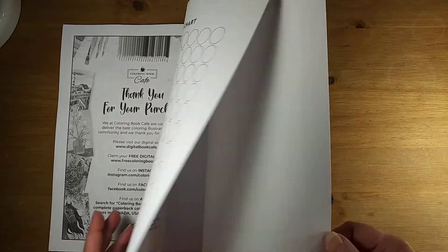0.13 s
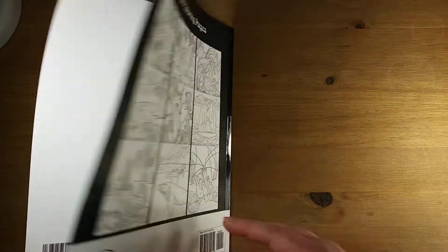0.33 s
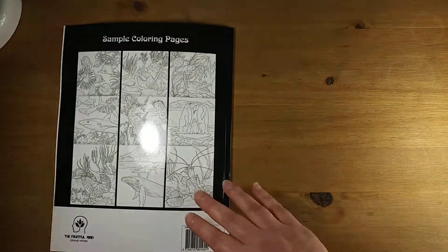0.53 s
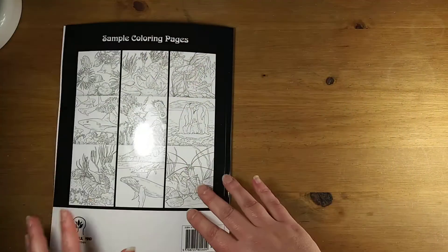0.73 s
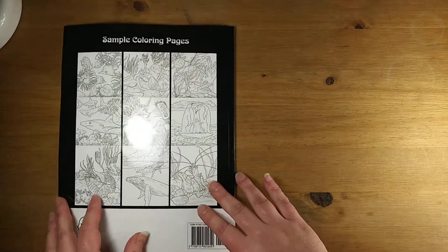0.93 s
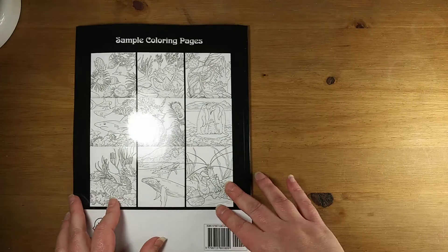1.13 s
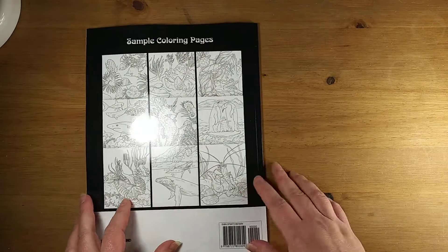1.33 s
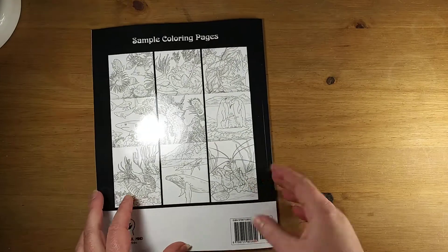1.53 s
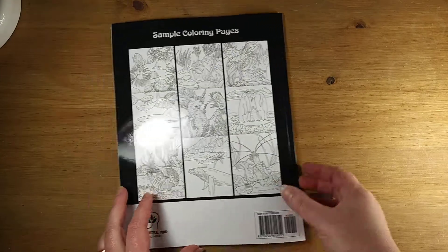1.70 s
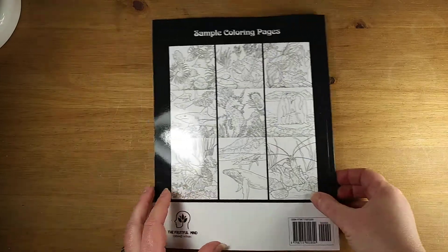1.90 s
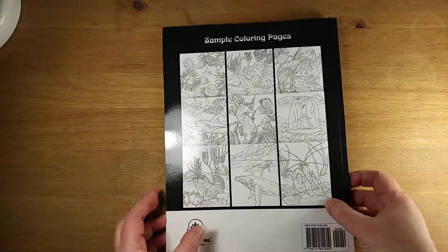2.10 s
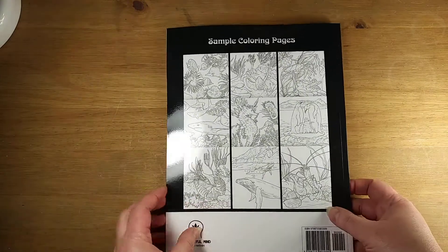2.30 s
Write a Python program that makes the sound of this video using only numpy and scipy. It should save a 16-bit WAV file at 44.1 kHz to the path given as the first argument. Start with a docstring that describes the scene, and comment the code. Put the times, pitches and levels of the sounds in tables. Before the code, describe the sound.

A paperback is flipped shut on a wooden table, heard close in a small room. Pages brush and flap, then land around 0.3 seconds in a quick run of soft thuds with a puff of air, settling by 0.5. Light ticks follow, and a fingertip tap at 1.3. The book slides quietly over the wood in short scrapes until about 2.2, and the cover clicks at 2.3.

```python
"""Paperback shut on a wooden table

A glossy paperback is flipped shut in a small room, heard from close above. Pages brush and flap,
the stack lands in a quick run of soft blows under a faint high hiss, and the cover settles on its
cushion of air. Fingers then tap, tick against the cover and slide the book across the wood."""
import sys
import numpy as np
from scipy import signal
from scipy.fft import rfft, irfft
from scipy.io import wavfile

SR = 44100
rng = np.random.default_rng(int(sys.argv[2]) if len(sys.argv) > 2 else 0)


def generate_wav(sig):
    """Save sig (samples, or channels by samples) to the path in sys.argv[1] as 16-bit PCM at SR."""
    pcm = np.round(np.clip(np.atleast_2d(sig).T, -1, 1) * 32767).astype(np.int16)
    wavfile.write(sys.argv[1], SR, pcm)


N = 103635


def amp(db):
    """Decibels to gain."""
    return 10 ** (np.asarray(db) / 20)


def unit(x):
    """Scales to an energy of one."""
    return x / np.sqrt(np.sum(x ** 2) + 1e-20)


def steady(x):
    """Scales to an rms of one."""
    return unit(x) * np.sqrt(len(x))


def curve_at(points, hz):
    """Reads a curve on a logarithmic frequency axis."""
    f, value = np.transpose(points)
    return np.interp(np.log(hz + 1), np.log(f + 1), value)


def add(mix, s, sound):
    """Mixes a sound in at s seconds."""
    at = round(s * SR)
    sound = sound[max(-at, 0):]
    part = mix[max(at, 0):][:len(sound)]
    part += sound[:len(part)]


def equalise(x, curve, tilt_db=0, cutoff_hz=None, order=3.04, size=4096):
    """Minimum-phase EQ from a curve, with a tilt per octave and an optional high cut."""
    hz = np.fft.rfftfreq(size, 1 / SR)
    gain = amp(curve_at(curve, hz) + tilt_db * np.log2(hz + 20))
    if cutoff_hz:
        gain = gain / np.sqrt(1 + (hz / cutoff_hz) ** (2 * order))
    cepstrum = irfft(np.log(gain / gain.max() + 1e-6))
    cepstrum[1:size // 2] *= 2  # folded forward, so nothing rings ahead of a hit
    cepstrum[size // 2 + 1:] = 0
    return signal.fftconvolve(x, irfft(np.exp(rfft(cepstrum))))[:len(x)]


def resonate(x, hz, width_hz):
    """One resonance, applied twice for steep flanks."""
    b, a = signal.iirpeak(hz, hz / width_hz, fs=SR)
    return signal.lfilter(b, a, signal.lfilter(b, a, x))


def grains(count, spread_db=3, per_s=7000):
    """A dense crackle of tiny impulses, of random size and sign."""
    sizes = amp(spread_db * np.minimum(rng.exponential(1, count), 4))
    return sizes * rng.choice([-1, 1], count) * (rng.random(count) < per_s / SR)


def swell(rise_s, decay_s, roundness, peak_s=.1):
    """Gives the peak time and sound of a grain cloud that rises and dies."""
    t = np.arange(SR // 2) / SR - peak_s
    envelope = np.exp(-np.maximum(-t / rise_s, t / decay_s) ** roundness)
    return peak_s, grains(len(t)) * envelope


def stroke(start, end, attack_s, release_s):
    """An envelope that rises up to start, holds until end, then releases."""
    t = np.arange(N) / SR
    return np.exp(-np.maximum(np.maximum((start - t) / attack_s, (t - end) / release_s), 0))


# Room tone EQ: f/Hz, level/dB
ROOM_TONE_EQ = [(25, -25.5), (85, -28), (160, -14.5), (220, -5), (400, -2.5), (700, -5.5), (1100, -8.5),
                (3300, -12.5), (4600, -17), (5600, -21), (8300, -25), (10200, -16), (13000, -21.5),
                (15800, -19.5)]
def room_tone():
    """A faint, steady bed of room noise."""
    return amp(-65.5) * steady(equalise(rng.standard_normal(N), ROOM_TONE_EQ))


# Reverb time by band: f/Hz, T60/s
ROOM_T60 = [(150, 0.54), (400, 0.26), (1000, 0.34), (3000, 0.39), (8000, 0.24)]
def room(x, scatter_db=-3.5, scatter_decay_s=.0075, early_s=.034, tail_db=-17):
    """Quick, nearly colourless scatter from the table and things near by, then a short room tail."""
    t = np.arange(SR // 2) / SR
    near, far = rng.standard_normal((2, len(t))) * (t > .0006)
    scatter = 1 + amp(scatter_db) * rfft(unit(near * np.exp(-t / scatter_decay_s)), 2 * len(t))
    flattened = irfft(scatter / abs(scatter) ** .95)[:len(t)]
    early = flattened * np.exp(-(t / early_s) ** 2)
    hz, age, bands = signal.stft(far, SR, nperseg=256)
    decay = np.exp(-np.log(1000) * age / curve_at(ROOM_T60, hz)[:, None])
    tail = signal.istft(bands * decay, SR, nperseg=256)[1][:len(t)]
    return signal.fftconvolve(x, unit(early) + amp(tail_db) * unit(tail))[:N]


# Rustle and hiss cues: start/s, end/s, attack/s, release/s, level/dB, tilt/(dB per octave)
RUSTLE_AND_HISS = [(0, 0.026, .002, 0.02, -58.5, 0.5), (.067, 0.072, 0.0076, 0.016, -60.5, .5),
                   (0.097, 0.15, 0.0056, 0.015, -58, 0.2), (.29, .36, .02, 0.079, -65.5, 10.5),
                   (0.408, 0.459, 0.021, 0.019, -64, -2)]
# Their shared EQ: f/Hz, level/dB
RUSTLE_AND_HISS_EQ = [(60, -40), (200, -22), (450, 1.5), (700, -3.5), (1000, 5), (1500, -8.5), (2000, 1),
                      (3200, -2.5), (4200, 1.5), (5600, -4), (6600, -4), (8000, -12.5), (16000, -17)]
def rustle_and_hiss():
    """The cue at 0.29 s is a faint high treble hiss over the landing; the rest are pages brushing."""
    texture = grains(N, spread_db=4.5)
    return sum(stroke(*shape) * amp(db) * steady(equalise(texture, RUSTLE_AND_HISS_EQ, tilt_db))
               for *shape, db, tilt_db in RUSTLE_AND_HISS)


# Friction whistle cues: start/s, end/s, level/dB, f/Hz
WHISTLES = [(1.37, 1.517, -66.5, 850), (1.67, 1.703, -63, 4400)]
def edge_whistles(q=17, fade_s=.0083):
    """The cover's edge catches on the wood and sings thinly for a moment."""
    drag = grains(N)
    return sum(stroke(start, end, fade_s, fade_s) * amp(db) * steady(resonate(drag, hz, hz / q))
               for start, end, db, hz in WHISTLES)


# Slides of book and hands: start/s, end/s, attack/s, release/s,
# drone level/dB, drone f/Hz, hiss level/dB, hiss tilt/(dB per octave)
SLIDES = [(0.908, 1.322, 0.017, 0.049, -75.5, 870, -68.5, 3.5),
          (1.107, 1.185, 0.027, 0.012, -82, 850, -68, 7),
          (1.362, 1.391, 0.0029, 0.033, -52, 857, -54.5, -3),
          (1.397, 1.406, 0.017, 0.013, -63.5, 1170, -50.5, 5.5),
          (1.417, 1.525, 0.0079, 0.13, -67.5, 810, -65.5, 1.5),
          (1.628, 1.866, 0.055, 0.024, -73, 1040, -58.5, 2.6),
          (1.663, 1.714, 0.02, 0.008, -57.5, 1030, -53.5, 2.5),
          (1.734, 1.765, 0.0091, 0.036, -52.5, 1060, -52, 3.5),
          (1.848, 1.903, 0.0058, 0.028, -54.5, 990, -56, 2),
          (1.927, 2.039, 0.015, 0.039, -64, 985, -61.5, 0),
          (2.096, 2.149, 0.024, 0.1, -66.5, 810, -65, -0.5)]
# EQs of the woody drone and the paper hiss: f/Hz, level/dB
DRONE_EQ = [(60, -31), (150, -14.5), (290, 0), (680, 3), (1150, 6.5), (1400, -14), (16000, -56)]
HISS_EQ = [(100, -66), (900, -8.5), (1450, 3.5), (2300, 1.5), (3000, 1), (4500, -4), (5400, -9),
           (6800, -11), (8200, -20), (10000, -18), (16000, -30.5)]
def cover_slides():
    """The cover drags over the wood: paper hiss over a drone of book and table."""
    out = np.zeros(N)
    for *shape, drone_db, hz, hiss_db, tilt_db in SLIDES:
        drag, fibres = grains(N), grains(N)
        pitched = amp(.5) * unit(resonate(fibres, hz, width_hz=350))
        drone = steady(unit(equalise(drag, DRONE_EQ)) + pitched)
        hiss = steady(equalise(fibres, HISS_EQ, tilt_db))
        out += stroke(*shape) * (amp(drone_db) * drone + amp(hiss_db) * hiss)
    return out


# Modes of the book on the table: f/Hz, level/dB, T60/s
TABLE_MODES = [(222, -10, .22), (263, -2, .19), (362, 0, .12), (421, -5, .2), (455, -6, .2), (556, -6, .17),
               (620, -4, .15), (686, -8, .13), (818, -7, .17), (939, 1, .09), (1416, -11, .1),
               (1568, -4, .09)]
def with_table_ring(push, ring_db):
    """A push on the book together with the ringing it starts in the table."""
    t = np.arange(len(push)) / SR
    modes = sum(amp(db) * np.exp(-np.log(1000) * t / t60) * np.cos(2 * np.pi * hz * t)
                for hz, db, t60 in TABLE_MODES)
    ring = signal.fftconvolve(push, modes)[:len(t)]
    return unit(unit(push) + amp(ring_db) * unit(ring))


def knocks(cues, eq, ring_db):
    """Soft blows: the longer the contact, the duller the knock."""
    out, t = np.zeros(N), np.arange(SR // 2) / SR
    for s, db, contact_s in cues:
        push = equalise(np.exp(-t / contact_s), eq)
        add(out, s, amp(db) * with_table_ring(push, ring_db))
    return out


# Fingertip hits: t/s, level/dB, contact/s
TAPS = [(1.283, -32.5, 0.00034), (1.3152, -24.5, 0.0005), (1.5427, -31, 0.00025), (1.6635, -30.5, 0.0048),
        (1.8835, -33.5, 0.000065), (2.087, -32.5, 0.0022)]
# Fingertip EQ: f/Hz, level/dB
TAP_EQ = [(60, -51), (125, -9), (200, -0.5), (400, -1), (900, 4.5), (2000, -0.5), (16000, -45)]
def finger_taps():
    """Fingertips bump the book and the wood answers."""
    return knocks(TAPS, TAP_EQ, ring_db=0)


# Nail, page and cover ticks: t/s, level/dB, tilt/(dB per octave), chatter decay/s, chatter level/dB
TICKS = [(0.1677, -25, 1, 0.0017, -14), (0.7688, -37, 2, 0.00044, -2), (0.9444, -23, 2.5, .0008, 4),
         (1.315, -31, -1.5, 0.0024, 7), (1.6605, -25.5, 0.2, 0.0037, -13), (1.8831, -25, 1, .001, -4),
         (2.3154, -16.5, 1.1, 0.0009, -16)]
# Tick EQ: f/Hz, level/dB
TICK_EQ = [(60, -39), (200, -13), (800, 6), (1400, 3), (2100, 9.5), (2800, 4.5), (3700, 7), (4900, 1),
           (5600, -7), (7000, -7), (9000, -10.5), (15000, -18.5)]
def cover_ticks(wood_db=-13):
    """Snaps on the stiff glossy cover: a click, brief edge chatter and a knock through to the wood."""
    out, t = np.zeros(N), np.arange(SR // 4) / SR
    click = signal.unit_impulse(len(t))
    wood = amp(wood_db) * with_table_ring(equalise(click, TAP_EQ), ring_db=0)
    for s, db, tilt_db, chatter_s, chatter_db in TICKS:
        chatter = amp(chatter_db) * unit(grains(len(t)) * np.exp(-t / chatter_s))
        snap = unit(equalise(click + chatter, TICK_EQ, tilt_db))
        add(out, s, amp(db) * (snap + wood))
    return out


# Page flap cues: t/s, level/dB, rise/s, decay/s, tilt/(dB per octave), pop f/Hz, pop level/dB
FLAPS = [(0.1674, -20, 0.001, 0.0021, -0.9, 890, 1), (0.2416, -8.5, .0011, 0.0034, 1.1, 3690, -4),
         (.504, -23.5, 0.0014, 0.01, -0.9, 804, -4), (0.544, -31.5, 0.0067, 0.0068, 0.5, 2200, -3)]
# Paper slap EQ: f/Hz, level/dB
FLAP_EQ = [(60, -58), (140, -16), (260, -1), (520, 2), (900, -7.5), (1450, 3.5), (2100, -6.5), (2750, 2.5),
           (3200, -2), (3750, -7.5), (4800, -1.5), (5500, -20.5), (6400, -8), (7500, -19.5), (9800, -15.5),
           (15000, -28)]
def page_flaps():
    """Page edges slip free and slap their neighbours; each bent sheet pops at its own pitch."""
    out = np.zeros(N)
    for s, db, rise_s, decay_s, tilt_db, hz, pop_db in FLAPS:
        peak_s, cloud = swell(rise_s, decay_s, roundness=.58)
        slap = unit(equalise(cloud, FLAP_EQ, tilt_db))
        pop = amp(pop_db) * unit(resonate(cloud, hz, width_hz=720))
        add(out, s - peak_s, amp(db) * (slap + pop))
    return out


# Puffs of air and pattering pages: t/s, level/dB, rise/s, decay/s, high cut f/Hz
PUFFS = [(.308, -1.5, 0.02, 0.013, 1550), (.34, -4.5, 0.015, 0.01, 1070), (0.433, -11, .025, 0.023, 563)]
# Puff EQ: f/Hz, level/dB
PUFF_EQ = [(40, -52), (105, -39.5), (165, -15), (260, -8), (380, -0.5), (500, -5), (700, -1.5), (950, -2.5),
           (1300, -5), (3000, -11), (16000, -38)]
def closing_puffs():
    """Pages patter down as the air is squeezed out, duller as the stack settles."""
    out = np.zeros(N)
    for s, db, rise_s, decay_s, cutoff_hz in PUFFS:
        peak_s, cloud = swell(rise_s, decay_s, roundness=1.13)
        puff = equalise(cloud, PUFF_EQ, cutoff_hz=cutoff_hz)
        add(out, s - peak_s, amp(db) * with_table_ring(puff, ring_db=-7))
    return out


# Page stack hits: t/s, level/dB, contact/s
THUDS = [(.2672, -21, 0.00042), (.2793, -8.5, 0.00002), (.2852, -6, 0.00069), (.2935, -13, 0.0011),
         (.3068, -5, 0.00054), (.3305, -18.5, 0.0016), (.3378, -16.5, .0008)]
# Thud EQ: f/Hz, level/dB
THUD_EQ = [(40, -45), (90, -35), (160, -10.5), (250, 5.5), (370, 7), (550, 4.5), (1000, -0.5), (1650, 1.5),
           (2200, -2.5), (3000, -7.5), (5200, -40), (16000, -53)]
def stack_landing():
    """The page stack lands in a quick run of thuds that ring the table."""
    return knocks(THUDS, THUD_EQ, ring_db=-3.5)


def scene():
    """The closing book and the hands in the room, over a bed of room tone, in mono."""
    closing = stack_landing() + closing_puffs() + page_flaps() + rustle_and_hiss()
    hands = finger_taps() + cover_ticks() + cover_slides() + edge_whistles()
    bed = room_tone()
    return (room(closing + hands) + bed)[None]


def record(dry, cutoff_hz=15900):
    """A steep high cut on the whole mix."""
    taps = signal.firwin(511, cutoff_hz, window=("kaiser", 9), fs=SR)
    return signal.oaconvolve(dry, taps[None], "same")


dry = scene()
out = record(dry)
generate_wav(out)
```